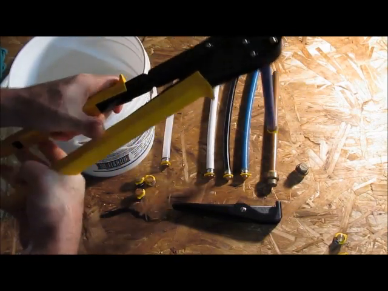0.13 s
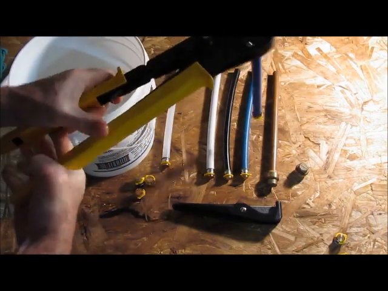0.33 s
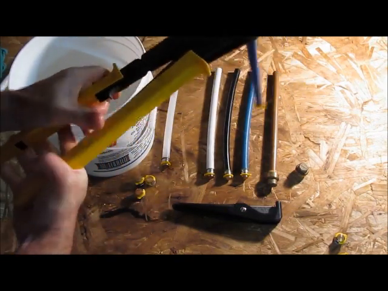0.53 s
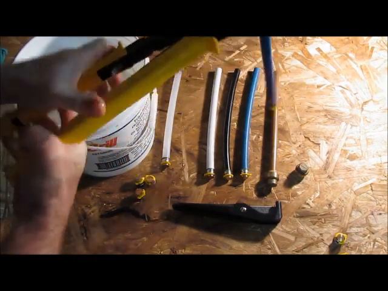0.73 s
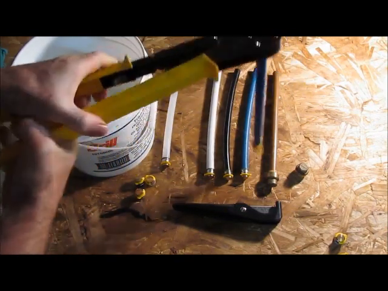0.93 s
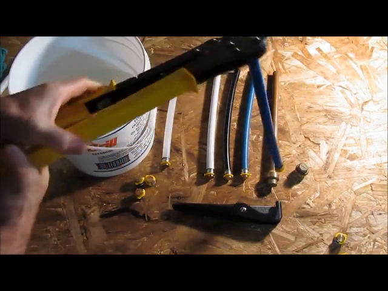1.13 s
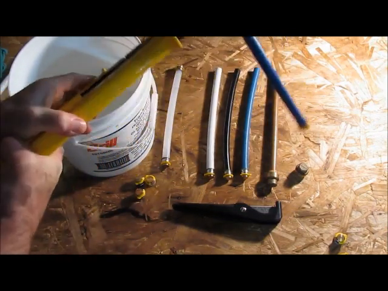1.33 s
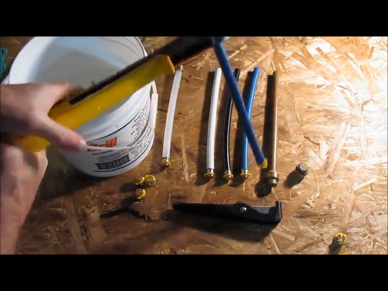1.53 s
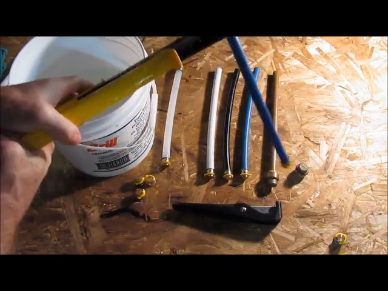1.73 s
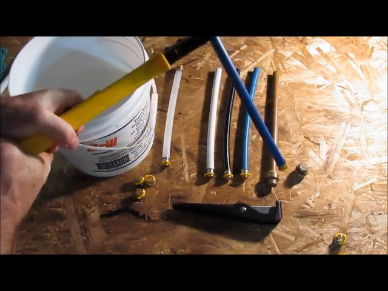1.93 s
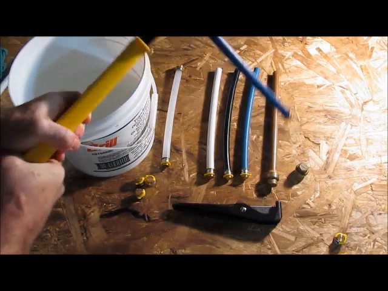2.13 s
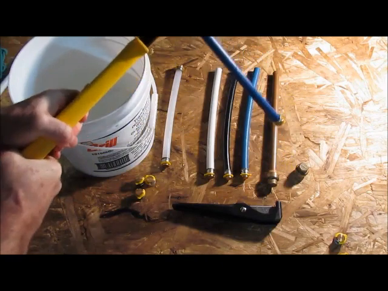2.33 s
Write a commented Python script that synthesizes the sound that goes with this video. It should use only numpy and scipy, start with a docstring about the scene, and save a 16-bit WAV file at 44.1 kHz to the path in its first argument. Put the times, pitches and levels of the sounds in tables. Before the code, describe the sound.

Close stereo pick-up of a ratchet press tool at a workbench: a small tick and strained creak, a loud clanking double crack, quiet hand friction, light rattling, then two crisp steel snaps with short room tails.

```python
"""Workbench in a small room: a hand press tool is worked close to a small stereo microphone pair.
Ratchet pawl snaps and ticks are noise cracks through steel resonances, each with one rebound and a room tail.
The handle rings as a damped, unsteady sine and hums as resonant noise under load; a faint steady tone ends it.
Joints and hands rub as gritty band noise, over stereo hiss whose level follows a drawn curve."""
import sys
import numpy as np
from scipy import signal
from scipy.fft import rfft, irfft, next_fast_len
from scipy.io import wavfile
from scipy.ndimage import uniform_filter1d

SR = 44100
rng = np.random.default_rng(int(sys.argv[2]) if len(sys.argv) > 2 else 0)


def wrap_up_sound(samples):
    """Save the sound to the file named by the first command line argument, as 16-bit audio."""
    columns = np.atleast_2d(samples).T
    # keep every value between -1 and 1, then stretch to whole-number steps
    tamed = np.clip(columns, -1, 1)
    steps = np.round(tamed * 32767).astype(np.int16)
    wavfile.write(sys.argv[1], SR, steps)


N = 110250

# background level curve: (t/s, level/dB)
HISS_LEVEL = [(0, -62), (0.199, -55.5), (.25, -79), (.5, -76), (0.599, -75), (0.949, -71), (1.2, -65),
              (1.5, -63), (1.9, -60.5), (2.07, -59), (2.12, -66.5), (2.209, -61), (2.27, -71.5),
              (2.36, -70.5), (2.5, -70)]
# background spectrum: (f/Hz, relative density/dB)
HISS_SPECTRUM = [(15, -11), (30, 2), (120, 5.5), (580, 8), (1000, 6.5), (2060, 1), (5000, -2.5),
                 (11500, -4), (13500, -8.5), (15300, -11), (16200, -31.5)]
# background left-right correlation: (f/Hz, correlation)
HISS_LIKENESS = [(60, 0.27), (240, 0.059), (950, -0.12), (3770, 0.5), (15000, 0.62)]
# rubbing strokes: (t/s, rise/s, 20 dB fall/s, level/dB, centre f/Hz, width/octaves, left-right/dB)
RUBS = [(.015, .01, .15, -49.5, 3000, 2.06, 3.5), (.07, .06, 0.22, -53.5, 4000, 1.3, 9.5),
        (.55, 0.072, 0.41, -68.5, 714, 1.5, 1.5), (.755, 0.028, .2, -58.5, 2870, 2.7, 2),
        (0.811, .06, .08, -53.5, 9110, 2.5, 1.5), (1.11, .035, 0.0827, -60, 5145, 2, 2),
        (1.289, .022, .04, -55.5, 7458, 0.5, 10.5), (1.468, .04, .15, -54.5, 5060, 2, 1),
        (1.56, .02, .1, -58.5, 9970, 1.44, 3), (1.702, .02, 0.1, -69, 9000, 2.5, 16),
        (1.855, .015, 0.064, -53.5, 4037, 2.7, 14.5), (1.969, .02, .2, -55, 6000, 2.2, 5),
        (2.045, .01, .06, -54.5, 10100, 0.73, 0.5), (2.47, .02, .05, -68.5, 9146, 2.4, 8)]
# handle hum while the joint slides under load: (start t/s, end t/s, level/dB)
STRAIN = (.09, .2105, -52)
# handle resonances under load: (f/Hz, width/Hz, level/dB)
HANDLE_MODES = [(1000, 120, 6.5), (1170, 130, -3), (3200, 980, -9.5)]
# knocked handle: (t/s, f/Hz, level/dB, hold/s, T60/s)
RINGS = [(.016, 1000, -51.5, 0.0014, 0.037), (.067, 1000, -44, 0.0016, 0.046),
         (0.2104, 1170, -20.5, 0.0058, 0.034), (0.228, 1170, -38, 0.0046, 0.14),
         (.337, 1198, -44.5, .005, 0.046), (.338, 1180, -55.5, .01, 0.26),
         (0.777, 1150, -53.5, .004, 0.024), (0.895, 1314, -45.5, 0.0011, 0.043),
         (1.717, 1180, -62, 0.0027, 0.056), (2.072, 1258, -43.5, 0.036, 0.098)]
# pawl and joint contacts: (t/s, 8 x band rms level over 5 ms/dB, left-right/dB, rebound/dB, room/dB)
CLICKS = [(0.0159, -71.5, -59.1, -61.2, -60.1, -65.0, -64.1, -68.5, -73.7, 0.8, -8.0, -11.0),
          (0.0664, -71.2, -48.7, -44.0, -34.5, -37.8, -42.7, -41.9, -61.4, 3.1, -8.0, -11.0),
          (0.2106, -45.9, -24.7, -29.0, -18.0, -25.1, -23.0, -26.7, -42.9, 4.3, -6.0, -16.0),
          (0.2195, -56.1, -39.0, -39.8, -29.6, -20.2, -20.3, -26.6, -39.4, 1.1, -14.0, -16.0),
          (0.2257, -65.5, -43.9, -47.5, -41.0, -33.6, -32.2, -39.8, -44.7, 1.8, -14.0, -16.0),
          (0.2279, -52.7, -33.0, -33.6, -25.3, -19.7, -13.5, -14.8, -28.5, 1.1, -6.0, -16.0),
          (0.2347, -65.2, -37.5, -49.8, -42.2, -34.2, -31.4, -35.2, -46.8, 1.7, -14.0, -16.0),
          (0.3384, -71.0, -57.3, -63.1, -59.1, -60.7, -62.6, -63.0, -78.8, 3.3, -14.0, -14.0),
          (0.4715, -90.8, -79.1, -83.5, -82.6, -75.3, -68.3, -73.4, -82.4, 2.8, -14.0, -14.0),
          (0.7035, -88.1, -75.4, -80.4, -80.8, -82.1, -78.4, -74.5, -88.6, 1.8, -14.0, -14.0),
          (0.777, -80.2, -63.8, -60.1, -63.9, -66.0, -67.9, -74.0, -85.7, 2.6, -14.0, -14.0),
          (0.8891, -79.3, -40.8, -51.9, -52.8, -51.1, -62.2, -63.8, -80.4, 3.0, -14.0, -6.0),
          (1.0166, -84.9, -74.3, -78.2, -76.7, -73.2, -69.2, -70.8, -80.1, 0.8, -14.0, -14.0),
          (1.2572, -78.2, -67.0, -71.1, -72.1, -75.6, -73.1, -74.0, -84.2, 2.2, -14.0, -14.0),
          (1.3467, -81.2, -73.5, -70.8, -72.1, -67.5, -59.3, -55.5, -67.4, -0.1, -14.0, -14.0),
          (1.5094, -75.5, -58.9, -60.6, -62.0, -63.9, -62.4, -62.7, -71.2, 3.1, -14.0, -14.0),
          (1.5762, -77.3, -67.7, -68.3, -66.4, -63.8, -63.1, -58.7, -68.1, 1.5, -14.0, -14.0),
          (1.6679, -79.7, -63.4, -63.6, -56.7, -61.0, -66.9, -70.7, -77.1, 6.5, -14.0, -14.0),
          (1.7194, -83.4, -61.5, -68.0, -69.1, -70.0, -69.3, -71.6, -74.4, 1.9, -14.0, -14.0),
          (1.8501, -75.2, -62.9, -64.3, -63.5, -58.5, -53.8, -53.1, -56.9, 7.0, -14.0, -14.0),
          (1.8679, -65.3, -52.5, -52.8, -48.9, -52.9, -55.2, -53.9, -56.0, 6.8, -14.0, -14.0),
          (1.8726, -65.8, -57.6, -48.2, -48.1, -51.2, -50.2, -45.9, -59.0, 6.4, -14.0, -14.0),
          (1.8765, -75.5, -58.5, -56.3, -53.1, -59.2, -54.6, -50.2, -59.5, 5.9, -14.0, -14.0),
          (1.9739, -72.3, -61.5, -59.0, -56.3, -53.8, -53.7, -51.4, -58.9, 8.5, -14.0, -14.0),
          (1.9848, -66.1, -52.1, -52.6, -50.2, -54.1, -56.1, -44.1, -45.1, 7.5, -14.0, -14.0),
          (1.9886, -73.3, -61.2, -56.7, -58.0, -56.1, -54.9, -54.1, -65.1, 7.7, -14.0, -14.0),
          (2.0058, -68.7, -53.2, -56.9, -53.8, -51.5, -45.4, -46.2, -51.1, 7.7, -14.0, -14.0),
          (2.0721, -71.5, -56.3, -54.6, -51.1, -42.8, -40.3, -41.3, -36.9, 1.9, -14.0, -10.0),
          (2.0729, -48.1, -31.6, -32.4, -29.5, -25.8, -19.5, -16.8, -24.8, 2.0, -6.0, -10.0),
          (2.2085, -52.8, -42.0, -36.8, -29.8, -26.0, -21.9, -14.8, -24.1, 2.0, -6.0, -10.0),
          (2.2194, -82.8, -59.5, -56.1, -52.3, -40.3, -35.5, -34.0, -44.2, 1.4, -14.0, -10.0)]
# bands of the contact levels: (low f/Hz, high f/Hz)
BANDS = [(40, 650), (950, 1500), (1650, 2450), (2550, 4300), (4500, 6650), (6950, 9300), (9700, 12600),
         (13800, 16500)]
# steel resonances: (f/Hz, width/Hz, level/dB)
STEEL_MODES = [(2400, 100, 3.5), (3064, 390, 17.5), (3800, 300, -0.5), (4966, 140, 13.5), (6220, 500, 8.5),
               (7200, 140, 9.5), (9140, 150, 7), (9150, 400, 7.5), (10200, 1500, 9.5), (11150, 500, 3.5),
               (12000, 1500, -1)]
# room decay: (f/Hz, T60/s)
ROOM_T60 = [(300, .15), (1500, 0.41), (4000, .36), (9000, .3), (13000, 0.23), (15500, 0.21)]
# room tail spectrum: (f/Hz, relative level/dB)
ROOM_TONE = [(300, -11), (1500, 0.5), (4000, 8.5), (9000, 4.5), (13000, 3), (15500, 5.5)]

GRIT_RMS_DB, RUB_TOP_HZ = 3.5, 13840
RING_ROUGH, RING_RISE_S, RING_ROOM_DB = .2, .0005, -8
TONE_S, TONE_HZ, TONE_DB, TONE_RISE_S = 2.1, 1250, -69, .05
CRACK_T60_S, CRACK_RISE_S, STEEL_DB = .0038, .00025, -7.5
REBOUND_S, ROOM_GAP_S = .0022, .0022
LAG_S_PER_DB = 5e-6  # right-port delay per dB of left-right difference
LOW_HZ, TOP_HZ, EDGE_HZ = 35, 16500, 120


def amp(db):
    """dB to gain."""
    return 10 ** (np.asarray(db) / 20)


def unit(x):
    """Scales x to rms 1."""
    return x / np.sqrt(np.mean(x ** 2) + 1e-20)


def along(points, hz):
    """Interpolates (f/Hz, value) points on a log-frequency axis."""
    f, v = np.transpose(points)
    return np.interp(np.log(hz + 1), np.log(f + 1), v)


def filtered(x, response):
    """Filters x by a complex response of frequency."""
    m = next_fast_len(x.shape[-1] + 8192)
    spectrum = rfft(x, m) * response(np.fft.rfftfreq(m, 1 / SR))
    return irfft(spectrum, m)[..., :x.shape[-1]]


def resonances(modes):
    """Causal response of parallel second-order resonators of alternating sign."""
    def response(f):
        total = 0
        for k, (hz, width_hz, db) in enumerate(modes):
            damping = 1j * f * width_hz
            total = total + (-1) ** k * amp(db) * damping / (hz * hz - f * f + damping)
        return total
    return response


def toned(x, levels_db):
    """Minimum-phase filter that gives each of BANDS its rms level over 5 ms."""
    z, f = rfft(x, 4096), np.fft.rfftfreq(4096, 1 / SR)
    power = [np.sum(abs(z[(f >= lo) & (f < hi)]) ** 2) / 2048 / (.005 * SR) for lo, hi in BANDS]
    band_gain_db = levels_db - 10 * np.log10(power)
    gain_db = np.interp(f, np.ravel(BANDS), np.repeat(band_gain_db, 2))
    # fold the cepstrum: minimum phase
    cepstrum = irfft(np.log(amp(gain_db)))
    cepstrum = cepstrum * np.r_[1, 2 * np.ones(2047), 1, np.zeros(2047)]
    return irfft(z * np.exp(rfft(cepstrum)))[:2048]


def room(x):
    """Room tail: x convolved with stereo noise that decays at its own rate at each frequency."""
    hz, t, z = signal.stft(rng.standard_normal((2, SR // 2)), SR, nperseg=256)
    decay_db = along(ROOM_TONE, hz)[:, None] - 60 * t / along(ROOM_T60, hz)[:, None]
    tail = signal.istft(z * amp(decay_db), SR, nperseg=256)[1]
    return signal.fftconvolve(x[None], tail / np.linalg.norm(tail[0]), axes=1)


def add(out, start_s, x, pan_db):
    """Mixes x in at start_s: left-right level difference, and a right-port lag that grows with it."""
    lag = max(round(.55 + pan_db * LAG_S_PER_DB * SR), 0)
    stereo = np.broadcast_to(x, (2, x.shape[-1]))
    for share, late, row, y in zip((.5, -.5), (0, lag), out, stereo):
        part = row[round(start_s * SR) + late:][:len(y)]
        part += amp(share * pan_db) * y[:len(part)]


def hiss():
    """Room air and microphone hiss: mid and side noise split to set the left-right correlation."""
    def mid_side(hz):
        angle = np.arccos(np.clip(along(HISS_LIKENESS, hz), -1, 1)) / 2
        return amp(along(HISS_SPECTRUM, hz)) * np.array([np.cos(angle), np.sin(angle)])

    mid, side = filtered(rng.standard_normal((2, N)), mid_side)
    t, db = np.transpose(HISS_LEVEL)
    level = amp(np.interp(np.arange(N) / SR, t, db))
    balance = amp([[1], [-1]])
    return level * np.array([mid + side, mid - side]) / np.std(mid) * balance


def rubs():
    """Friction of joints and hands: band noise with random grit swells and fades, partly shared by the ports."""
    out, t = np.zeros((2, N)), np.arange(SR // 2) / SR
    for start_s, rise_s, fall_s, db, centre_hz, octaves, pan_db in RUBS:
        def band(f):
            bell = np.exp(-.5 * (np.log2((f + 1) / centre_hz) / octaves) ** 2)
            tilt = np.sqrt(centre_hz / (f + 100))
            return bell * tilt / (1 + (f / RUB_TOP_HZ) ** 10)

        grit = amp(GRIT_RMS_DB * unit(uniform_filter1d(rng.standard_normal(len(t)), size=40)))
        noise = rng.standard_normal(len(t)) + 2.1 * rng.standard_normal((2, len(t)))
        noise = unit(filtered(noise * grit, band))
        swell = np.sin(np.pi / 2 * t / rise_s) ** 2
        fade = amp(-60 * (t - rise_s) / (3 * fall_s))
        add(out, start_s, amp(db) * np.where(t < rise_s, swell, fade) * noise, pan_db)
    return out


def frame_tone():
    """Faint steady ringing of the frame: one sine with a soft onset."""
    out, t = np.zeros((2, N)), np.arange(SR // 2) / SR
    tone = np.sin(2 * np.pi * TONE_HZ * t) * (1 - np.exp(-t / TONE_RISE_S))
    add(out, TONE_S, amp(TONE_DB) * tone, 2)
    return out


def handle_strain():
    """Sliding under load: noise excites the handle resonances, rising over the first half."""
    out = np.zeros((2, N))
    start_s, end_s, db = STRAIN
    progress = np.linspace(0, 1, round((end_s - start_s) * SR))
    hum = unit(filtered(rng.standard_normal(len(progress)), resonances(HANDLE_MODES)))
    add(out, start_s, amp(db) * np.minimum(1, 2 * progress) * hum, 2)
    return out


def handle_rings():
    """Knocked handle: a mode with unsteady amplitude and phase holds, then decays, with a room tail."""
    out, t = np.zeros((2, N)), np.arange(SR // 2) / SR
    for start_s, hz, db, hold_s, t60_s in RINGS:
        a, b = [unit(uniform_filter1d(rng.standard_normal(len(t)), size=200)) for _ in range(2)]
        phase = 2 * np.pi * hz * t
        wave = (1 + RING_ROUGH * a) * np.sin(phase) + RING_ROUGH * b * np.cos(phase)
        decay = amp(db - 60 * np.maximum(t - hold_s, 0) / t60_s)
        ring = decay * wave * (1 - np.exp(-t / RING_RISE_S))
        add(out, start_s, ring, 3)
        add(out, start_s, amp(RING_ROOM_DB) * room(ring), 2)
    return out


def clicks():
    """Pawl and joint contacts: a noise crack and one rebound drive the steel resonances, then the room."""
    out, t = np.zeros((2, N)), np.arange(1024) / SR
    envelope = amp(-60 * t / CRACK_T60_S) * (1 - np.exp(-t / CRACK_RISE_S))
    impulse = 1. * (t == 0)
    for start_s, *levels_db, pan_db, rebound_db, room_db in CLICKS:
        crack, fresh = rng.standard_normal((2, len(t))) * envelope
        # rebound: half the same crack, half new noise
        rebound = np.roll(crack + fresh, round(REBOUND_S * SR)) / np.sqrt(2)
        contact = crack + amp(rebound_db) * rebound
        contact = contact + amp(STEEL_DB) * filtered(contact, resonances(STEEL_MODES))
        add(out, start_s, toned(contact, levels_db), pan_db)
        tail = amp(room_db) * room(toned(impulse, levels_db))
        add(out, start_s + ROOM_GAP_S, tail, pan_db / 2)
    return out


def scene():
    """Sum of all sources."""
    return clicks() + handle_rings() + frame_tone() + handle_strain() + rubs() + hiss()


def record(dry):
    """Stereo pick-up: clips at full scale, then cuts the deepest bass and all above the band limit."""
    def response(hz):
        bass_cut = 1j * hz / (LOW_HZ + 1j * hz)
        return bass_cut / (1 + np.exp(np.clip((hz - TOP_HZ) / EDGE_HZ * 2, -50, 50)))

    return filtered(np.clip(dry, -1, 1), response)


dry = scene()
out = record(dry)
wrap_up_sound(out)
```